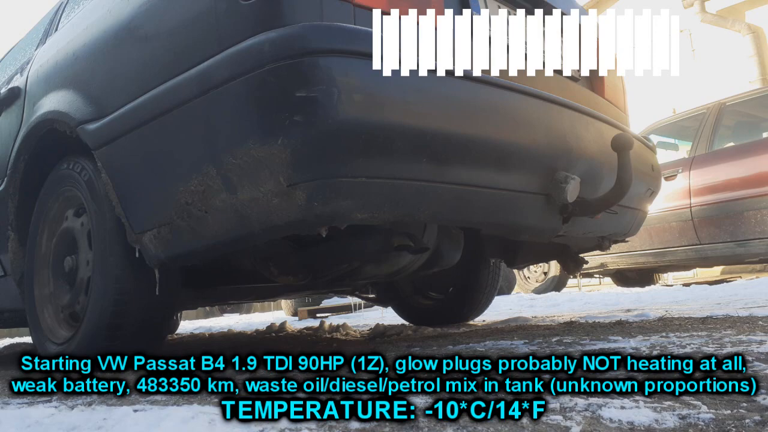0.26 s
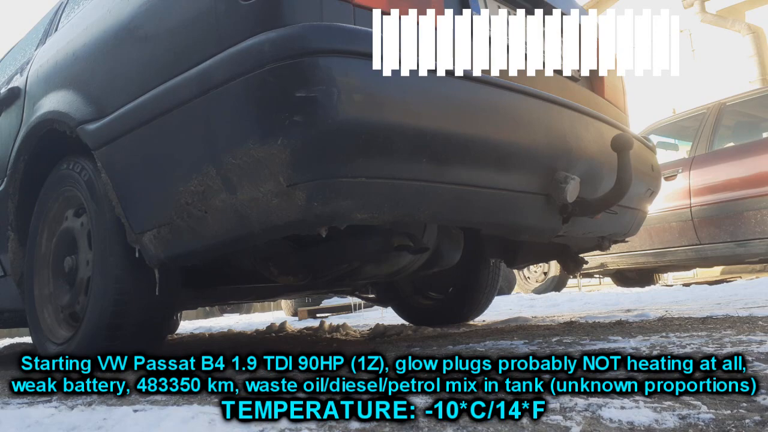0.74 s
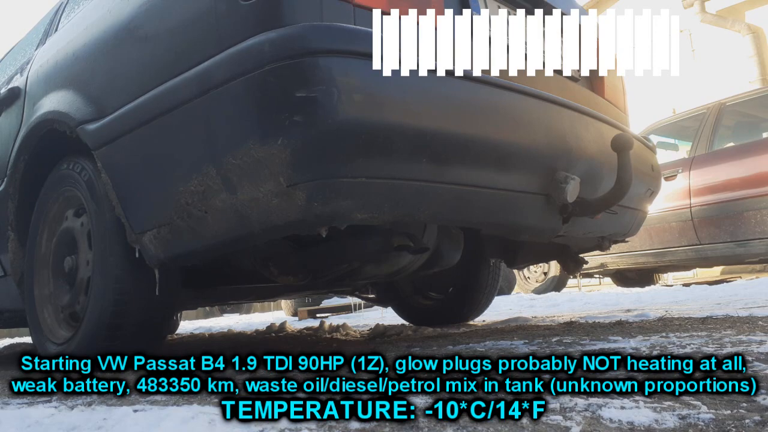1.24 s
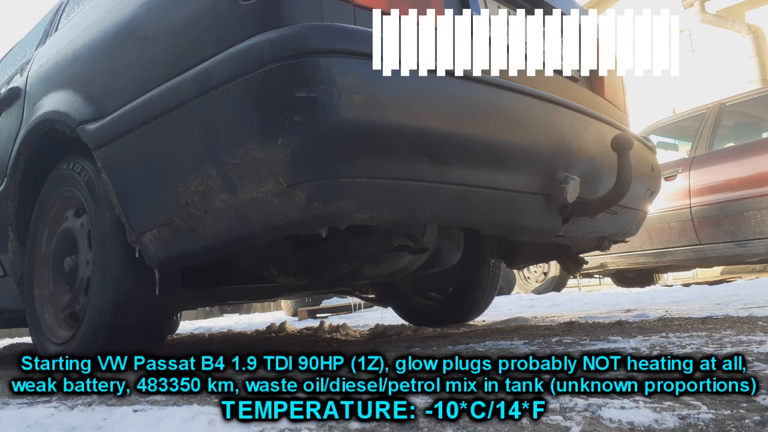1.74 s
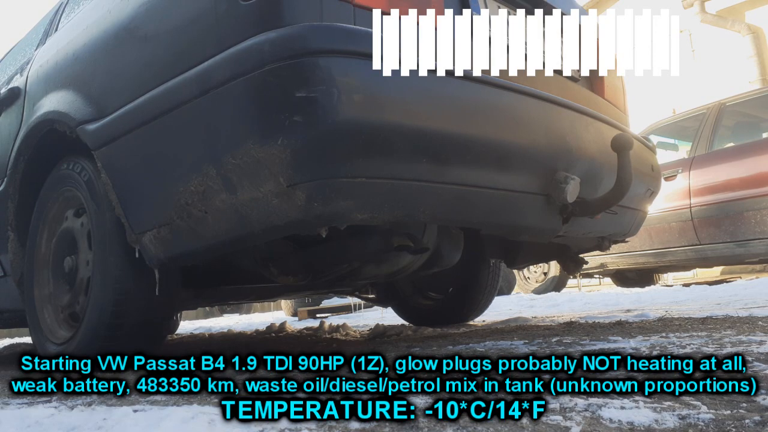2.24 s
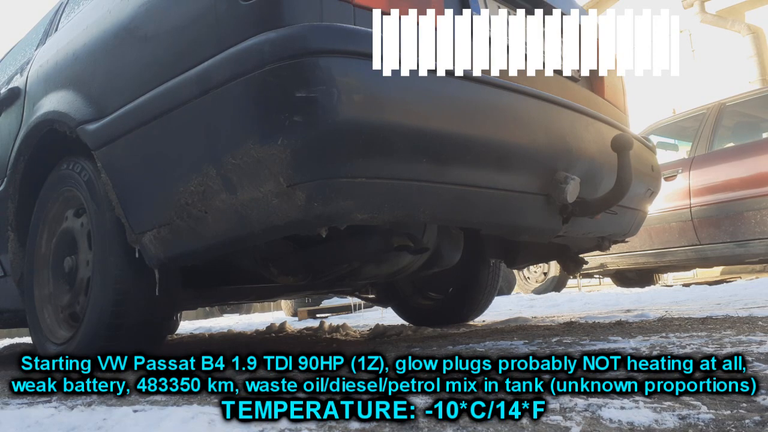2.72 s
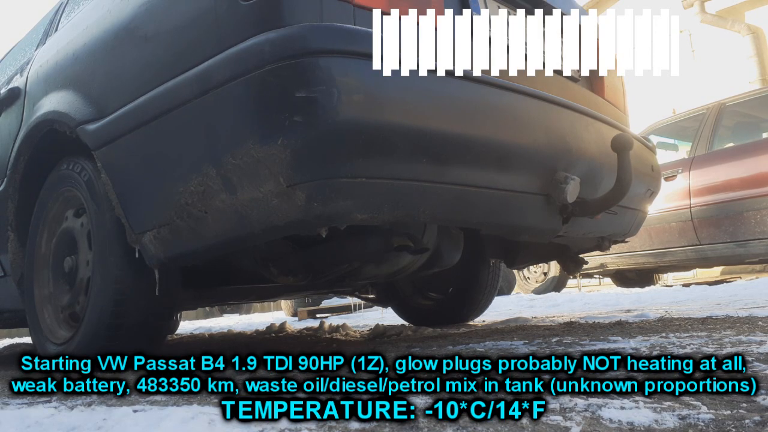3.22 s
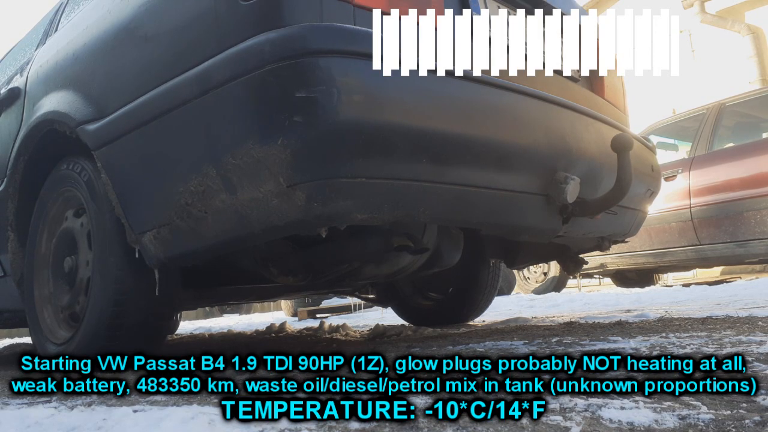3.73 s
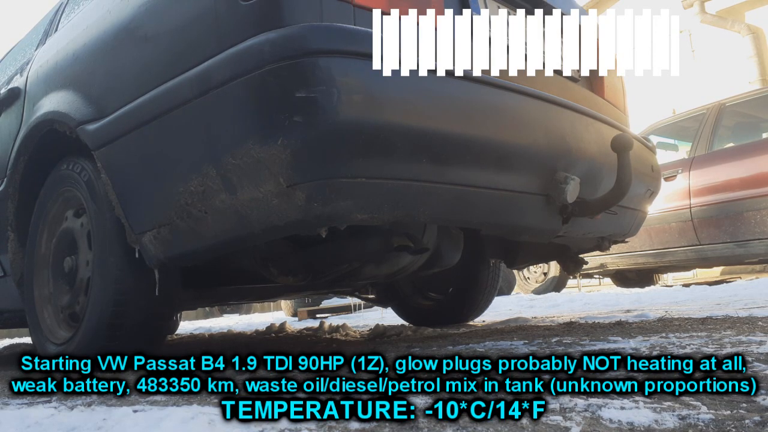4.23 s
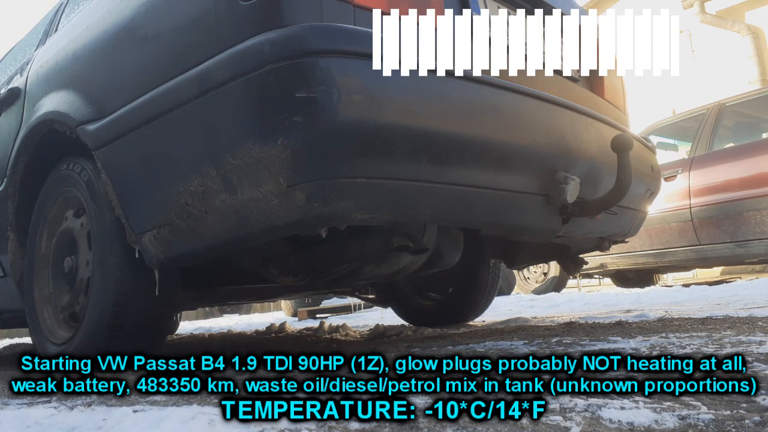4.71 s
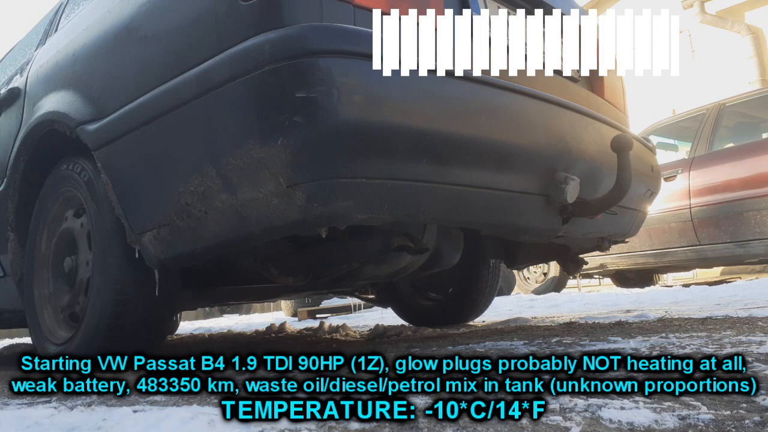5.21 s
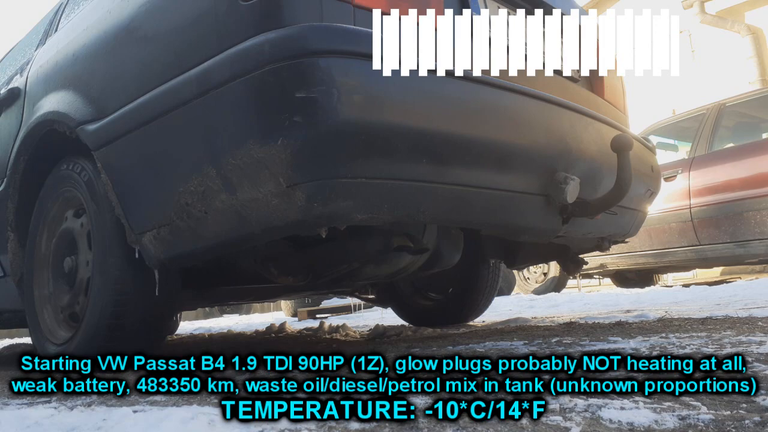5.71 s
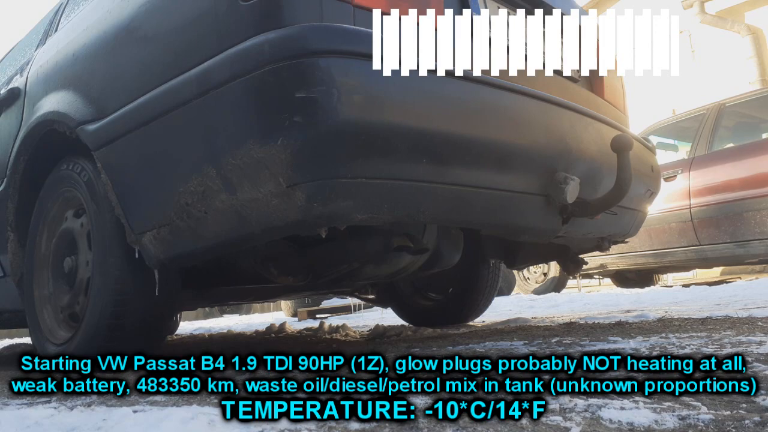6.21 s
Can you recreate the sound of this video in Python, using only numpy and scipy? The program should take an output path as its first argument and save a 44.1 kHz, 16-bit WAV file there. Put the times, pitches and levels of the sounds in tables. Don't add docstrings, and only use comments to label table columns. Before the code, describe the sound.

Muffled thumps, cloth rustle and small metallic ticks inside a parked car, then a starter motor grinds slowly, labouring through heavy compressions without the engine firing.

```python
import sys
import numpy as np
from scipy import signal
from scipy.fft import rfft, irfft, next_fast_len
from scipy.io import wavfile
from scipy.ndimage import uniform_filter1d, map_coordinates

SR = 44100
rng = np.random.default_rng(int(sys.argv[2]) if len(sys.argv) > 2 else 0)


def generate_wav(sig):
    pcm = np.round(np.clip(np.atleast_2d(sig).T, -1, 1) * 32767).astype(np.int16)
    wavfile.write(sys.argv[1], SR, pcm)


def elevation(decibels):
    levels = np.asarray(decibels, float)
    return 10 ** (levels / 20)


N = 284533
TIME = np.arange(N) / SR


def unit(x):
    return x / np.sqrt(np.mean(x ** 2) + 1e-20)


def along(points, hz):
    f, v = np.transpose(points)
    return np.interp(np.log(hz + 1), np.log(f + 1), v)


def curves(rows):
    s, *cols = np.transpose(rows)
    return [np.interp(TIME, s, c) for c in cols]


def wobble(rate_hz):
    knots = rng.standard_normal(int(N * rate_hz / SR) + 4)
    return map_coordinates(knots, [TIME * rate_hz])


def filtered(x, response):
    m = next_fast_len(N + 8192)
    mirror = x[..., :-1025:-1] * np.linspace(1, 0, 1024)
    x = np.concatenate([x, mirror], axis=-1)
    return irfft(rfft(x, m) * response(np.fft.rfftfreq(m, 1 / SR)), m)[..., :N]


def modes(table):
    def response(f):
        total = 0
        for k, (hz, width_hz, db) in enumerate(table):
            damping = 1j * f * width_hz
            total = total + (-1) ** k * elevation(db) * damping / (hz * hz - f * f + damping)
        return total
    return response


def rush(spectrum):
    return unit(filtered(rng.standard_normal((2, N)), lambda f: elevation(along(spectrum, f))))


def puffs(rows, rise_s, knock=0):
    shape, kick, t = np.zeros(N + SR // 2), np.zeros(N + SR // 2), np.arange(SR // 2) / SR
    for s, db, t60_s in rows:
        fall = elevation(db - 60 * t / max(t60_s, .005))
        shape[round(s * SR):][:len(t)] += fall * (1 - np.exp(-t / rise_s))
        kick[round((s + 2 * rise_s) * SR)] -= knock * elevation(db)
    return shape[:N] * rng.standard_normal((2, N)) + kick[:N] * [[1], [.5]]


def swells(rows, fall_db_per_s):
    gain = 0
    for s, hold_s, db, rise_s in rows:
        below_db = 35.5 * np.clip(s - TIME, 0, 9) / rise_s
        gain = gain + elevation(db - below_db - fall_db_per_s * np.clip(TIME - s - hold_s, 0, 9))
    return gain


def fuzzy(hz, spread_hz, steady=0):
    phase = 2 * np.pi * np.cumsum(hz) / SR
    slow = np.array([wobble(spread_hz) for _ in range(4)])
    return unit((slow[:2] + [[steady], [0]]) * np.sin(phase) + slow[2:] * np.cos(phase))


def flares(rows, spread_hz, steady):
    out = np.zeros((2, N + SR))
    for s, length_s, start_hz, end_hz, db in rows:
        u = np.arange(int(length_s * SR)) / (length_s * SR)
        phase = 2 * np.pi * np.cumsum(start_hz + (end_hz - start_hz) * u) / SR
        knots = rng.standard_normal((4, 64))
        slow = np.array([np.interp(u * length_s * spread_hz, np.arange(64), k) for k in knots])
        tone = (slow[:2] + [[steady], [0]]) * np.sin(phase) + slow[2:] * np.cos(phase)
        out[:, round(s * SR):][:, :len(u)] += elevation(db) * np.sin(np.pi * u) * unit(tone)
    return out[:, :N]


# [start_s, clack_db, loaded_s, growl_db, load_rise_db]
STROKES = [
    (4.579, -27.5, 0.1, -44, 0),
    (4.82, -46, 0.26, -41, 6.5),
    (5.15, -54, 0.18, -36.5, -0.5),
    (5.407, -46, 0.16, -38.5, 0.5),
    (5.655, -32, 0.17, -38, 0.5),
    (5.915, -36, 0.16, -37, 0.5),
    (6.181, -34, 0.16, -37, -0.5),
    (6.428, -47, 0.13, -44.5, 6),
]


def crank():
    start_s, _, loaded_s, *_ = np.transpose(STROKES)
    stroke = np.clip(np.searchsorted(start_s, TIME) - 1, 0, None)
    since_s = TIME - start_s[stroke]
    length_s = np.diff(start_s, append=start_s[-1] + .26)[stroke]
    loaded_s = loaded_s[stroke]
    slack = 1 + (since_s - loaded_s) / (length_s - loaded_s)
    return stroke, np.where(since_s < loaded_s, since_s / loaded_s, slack)


# [time_s, pitch_hz, whine_db, top_db, octave_db]
SPIN_UP = [(4.56, 363, -68, -79.5, -68), (4.63, 610, -54, -68, -62), (4.66, 685, -58, -55, -56),
           (4.685, 738, -52, -51, -41), (4.715, 760, -45, -57, -40), (4.735, 745, -38, -52, -41),
           (4.755, 715, -42, -54, -38), (4.775, 705, -45, -60, -42), (4.79, 776, -52, -58, -51),
           (4.82, 886, -55, -60, -62)]
# [phase, pitch_hz, whine_db]
LABOUR = [(0, 993, -42), (.12, 1034, -39), (.35, 898.7, -43), (.52, 820.9, -43), (.87, 502.1, -49),
          (1.25, 870.6, -45), (1.8, 895, -72), (2, 994.8, -64)]


def motor():
    first_top_hz, coast_db = 893, -36
    early_stroke, early_share = 4, .64
    stroke, phase = crank()
    early = stroke == early_stroke
    at, stroke_hz, stroke_db = np.transpose(LABOUR)
    hurried = np.where(early, np.interp(phase, [0, 1, 2], [0, 1 / early_share, 2]), phase)
    hz, db = np.interp(hurried, at, stroke_hz), np.interp(phase, at, stroke_db)
    recover_db = 9 * (hurried > 1.1) * (phase < .97) * early
    coasting = (stroke == 1) & (hz > first_top_hz) & (phase < 1)
    hz = np.where(coasting, first_top_hz, hz)
    db = db + coast_db * coasting + recover_db
    sing_db = 7 * np.exp(-((hz - 850) / 110) ** 2)
    top_db = -62 + sing_db - 9 * (phase > 1) - recover_db
    labour = [hz, db, top_db, db - 18.5]
    return uniform_filter1d(np.where(stroke == 0, curves(SPIN_UP), labour), size=700)


# [mode_hz, width_hz, level_db]
HOUSING = [(198, 35, -3.5), (262, 13.4, -1.5), (325, 46, -4.5), (522.6, 66, -3.5), (663, 75, -2),
           (783, 98, -1.5), (895, 21, 4), (1000, 44, 0), (1194, 9.4, -0.5), (1430, 64, -7)]
# [mode_hz, width_hz, level_db]
PINION = [(1731, 70, -4), (2111, 60, -7), (2438, 70, -2.5), (2668, 55, -2), (2900, 120, -6), (3330, 60, -4),
          (3545, 80, -1)]
# [freq_hz, density_db_per_hz]
GRIT = [(650, -3.5), (1100, 5), (1800, -8.5), (2640, -10.5), (3190, -13), (3530, -10.5), (3810, -10),
        (6830, -25.5), (8840, -49), (12400, -31.5), (16000, -38)]
# [phase, level_db]
GRIT_SHAPE = [(0, 9.3), (.15, 9.5), (.6, 8.76), (1, 1.8), (1.4, 3), (2, 1.5)]
# [phase, level_db]
RING_SHAPE = [(0, 14.5), (.45, -23), (.75, 4.5), (1.1, -1), (1.4, 6), (2, 5.5)]


def teeth():
    start_s, _, _, growl_db, rise_db = np.transpose(STROKES)
    stroke, phase = crank()

    def over(shape):
        return uniform_filter1d(np.interp(phase, *np.transpose(shape)), size=200)

    bite_db = 7 * np.exp(-np.clip(TIME - start_s[0] - .022, 0, 9) / .012)
    eased = np.clip((phase - .91) / (1.09 - .91), 0, 1)
    effort_db = rise_db[stroke] * np.minimum(phase, 1) * (1 - eased) - 5.5 * eased
    load = uniform_filter1d(elevation(growl_db[stroke] + effort_db * (stroke > 0) + bite_db), size=250)

    turns = np.cumsum(motor()[0] / 3 * (1 + .06 * wobble(90))) / SR
    strength = [[1.1], [0]] + np.tanh(rng.standard_normal((2, N)))
    hit = np.diff(np.floor(turns), prepend=0) * strength
    gate = np.exp(-2.5 * (turns % 1))
    drive = unit(hit) + .7 * unit(gate * rng.standard_normal((2, N)))

    lumpy = elevation(1.4 * np.tanh(wobble(60)))
    growl = load * unit(filtered(drive * lumpy, lambda f: modes(HOUSING)(f) / (1 + (f / 1900) ** 2)))
    choke_db = .63 * rise_db[stroke] * np.minimum(phase, 2 - phase)
    grit_db = -47 + np.where(stroke == 0, 2.5 + bite_db, over(GRIT_SHAPE) - choke_db)
    grit = elevation(grit_db) * unit((13.0 + gate) * rush(GRIT))
    ring_db = over(RING_SHAPE) - 63 - 7 * (stroke == 0) + 2.5 * wobble(40)
    ring = elevation(ring_db) * unit(filtered(drive, lambda f: modes(PINION)(f) ** 2))
    return growl + grit + ring


def rocking():
    start_s, _, loaded_s, *_ = np.transpose(STROKES)
    jolts_s = [4.64, 4.756, *(start_s[2:] + .042), *(start_s + loaded_s - .035)[1:]]
    sway = elevation(-60) + elevation(-47.5) * sum(np.exp(-((TIME - s) / .043) ** 2) for s in jolts_s)
    return sway * rush([(25, -36), (45, 8), (58, 11.0), (85, -0.5), (120, -14.5), (170, 7.5), (300, -61.5)])


THUD_DB = [-16.5, -34, -20, -17, -14.5, -13, -17]
# [start_s, level_db]
VALVES = [(4.775, -50), (5.09, -56), (5.36, -41), (5.592, -63), (5.86, -41), (6.108, -59), (6.335, -45),
          (6.385, -40)]


def knocks():
    def gritty(gain_db, low_cut_hz):
        return lambda f: elevation(along(GRIT, f) + gain_db) / (1 + (low_cut_hz / (f + 1)) ** 2)

    start_s, clack_db, *_ = np.transpose(STROKES)
    clacks = puffs([(s, db - 5.0, .06) for s, db in zip(start_s, clack_db)], rise_s=.0018)
    thuds = puffs([(s + .0086, db, .15) for s, db in zip(start_s[1:], THUD_DB)], rise_s=.0081)
    valves = puffs([(s, db, .2) for s, db in VALVES], rise_s=.019)
    block = modes([(195.5, 18, 2.9), (349.0, 21, 6.4)])
    return filtered(clacks, gritty(18.5, 1500)) + filtered(thuds, block) + filtered(valves, gritty(10.5, 1200))


# [start_s, length_s, start_hz, end_hz, level_db]
HOWLS = [(4.585, 0.056, 325, 320, -45.5), (4.7, 0.066, 196, 191, -42), (4.82, 0.051, 218, 205, -41),
         (4.87, 0.091, 1230, 1200, -51), (4.87, 0.049, 2450, 2450, -55), (5.02, 0.063, 341, 298, -35.5),
         (5.03, 0.043, 663, 627, -41), (5.2, 0.031, 884, 910, -49), (5.26, 0.04, 797, 752, -37),
         (5.29, 0.046, 325, 307, -39.5), (5.465, 0.027, 904, 895, -38), (5.5, 0.061, 3036, 2980, -59),
         (5.5, 0.048, 700, 650, -40), (6.03, 0.049, 746, 703, -38), (6.28, 0.057, 738.4, 690, -43.5),
         (4.93, 0.065, 900, 800, -45), (5.655, 0.032, 197, 193, -39), (5.75, 0.049, 671, 698, -40.5),
         (5.785, 0.051, 871, 903, -29), (5.84, 0.022, 2900, 2910, -59), (5.92, 0.041, 353, 344, -40.5),
         (5.96, 0.034, 930, 940, -35), (6.19, 0.049, 258, 246, -38), (6.2, 0.059, 994, 981, -37),
         (6.27, 0.039, 2954, 2920, -56)]
# [start_s, length_s, start_hz, end_hz, level_db]
STREAKS = [(4.565, 0.017, 3540, 3620, -55), (4.815, .035, 2870, 2800, -55), (4.82, 0.035, 2450, 2420, -55),
           (4.822, 0.052, 3515, 3620, -54), (4.872, 0.034, 3680, 3570, -50),
           (4.895, 0.052, 3450, 3250, -52), (5.1, 0.064, 3560, 3480, -62), (5.14, 0.034, 2560, 2590, -54.5),
           (5.158, 0.041, 3370, 3480, -52), (5.2, 0.054, 3700, 3270, -52), (5.195, .055, 2760, 2330, -52),
           (5.262, 0.038, 1506, 1200, -44), (5.355, 0.042, 3470, 3550, -61), (5.41, .04, 1494, 1290, -42),
           (5.462, 0.028, 3640, 3340, -49), (5.51, 0.045, 1494, 1334, -49), (5.588, 0.05, 3330, 3630, -52),
           (5.62, .045, 3550, 3570, -54), (5.648, 0.027, 2720, 2680, -56), (5.69, 0.046, 3560, 3520, -57),
           (5.71, 0.0367, 3420, 3260, -56), (5.685, .03, 1402, 1370, -47), (5.84, 0.05, 3530, 3470, -56),
           (5.91, 0.03, 2200, 2000, -48), (5.96, .04, 3615, 3260, -59), (6.02, 0.039, 1473, 1363, -46),
           (6.11, 0.051, 3510, 3560, -59), (6.11, 0.023, 1380, 1450, -49), (6.222, 0.042, 3620, 3360, -55),
           (6.355, 0.051, 3470, 3620, -53), (6.41, 0.034, 1234, 1460, -43)]


def starter():
    engaged = np.clip((TIME - 4.545) / .037, 0, 1) ** 3
    howls = flares(HOWLS, spread_hz=40, steady=2.2)
    streaks = elevation(2) * flares(STREAKS, spread_hz=90, steady=2.5)
    return engaged * (teeth() + rocking()) + knocks() + howls + streaks


def whine():
    hz, db, top_db, octave_db = motor()
    slow = np.clip((620 - hz) / 130, 0, 1)
    low = fuzzy(hz, 70, 1.8) + elevation(octave_db - db) * fuzzy(2 * hz, 90, 3)
    low = low + elevation(7) * slow * fuzzy(hz * 2 / 3, 30, 2)
    driving = 1. * (np.gradient(hz) * SR < 1500) + (TIME < 4.75)
    pushing = uniform_filter1d(driving, size=600).clip(.1, 1)
    top = elevation(-7) * fuzzy(3 * hz, 120, .6) + fuzzy(4 * hz, 200, 1.8)
    top = pushing * (top + elevation(-5) * (TIME < 4.8) * fuzzy(5 * hz, 250, .5))

    def flare(f):
        return .7 + .4 * abs(modes(HOUSING)(f)) + .25 * abs(modes(PINION)(f))

    return filtered((TIME > 4.56) * (elevation(db) * low + elevation(top_db + 1.0) * top), flare)


# [start_s, peak_db,
# brightness_db, t60_s]
THUMPS = [(0.534, -32.5, -40, 0.044), (0.56, -56, -4, 0.12), (0.585, -32.5, -14, 0.38),
          (0.612, -25, -24, 0.041), (0.666, -48, 1, 0.21), (0.705, -23, -18, 0.13),
          (0.712, -18.5, -26, 0.037), (0.725, -23, -14, 0.062), (2.822, -50, -33, 0.085),
          (3.701, -34, -31, 0.094), (3.808, -26.5, -26, 0.067), (0.93, -38, -33, 0.15),
          (1.012, -38.5, -27, 0.13), (1.237, -27.5, -32, 0.17), (1.292, -46, -33, 0.53),
          (1.347, -53, -26, 0.12), (1.39, -36, -29, 0.19), (1.61, -31.5, -25.5, 0.35),
          (1.641, -16, -51, 0.061), (2.118, -42, -13, 0.33), (2.789, -40, -19, 0.32),
          (3.016, -53, -2.5, 0.11), (2.327, -58, -5, 0.13), (3.421, -40.5, -30, 0.12),
          (3.502, -42.5, -41, 0.17), (3.582, -25.5, -22.5, 0.17), (3.651, -11.5, -18.5, 0.057),
          (3.795, -24.5, -24.5, 0.37), (3.817, -23, -15, 0.08), (3.842, -30, -16, 0.21),
          (3.891, -52, -27, 0.13), (4.141, -43, -22, 0.047), (4.34, -45, -5.5, 0.12),
          (4.362, -50, -9, 0.058), (4.386, -44, -13, 0.13), (3.663, -26, -15, 0.15), (4.55, -33, -12, 0.18)]
# [start_s, hold_s, level_db, rise_s]
SHUFFLE = [(.55, 0.069, -52, 0.082), (.7, 0.053, -52, 0.04), (.94, 0.0065, -53, 0.12),
           (1.38, 0.018, -56.5, 0.78), (1.46, 0.18, -64, 0.03), (1.64, 0.033, -52.5, 0.22),
           (3.61, 0.08, -50, 0.051), (3.84, 0.016, -47, 0.13), (3.9, 0.097, -58.5, 0.054)]
# [start_s, level_db, t60_s]
BOOMS = [(.6, -16, 0.47), (.71, -29, 0.24), (1.0, -29, 0.98), (3.65, -29, 0.24), (3.795, 0.5, 0.25),
         (3.84, -25, 0.15)]
# [mode_hz, width_hz, level_db]
SHELL = [(61, 14, -7), (105.5, 15, -1), (253.6, 203, 0.5), (368, 272, 0), (611, 180, -5)]
# [mode_hz, width_hz, level_db]
PANELS = [(800, 84, -0.5), (900, 140, 7), (1090, 204, 3.5), (1350, 195, 1), (1780, 54, -9), (2010, 90, -9),
          (2720, 350, -13)]


def driver():
    def soft(table, hz):
        return lambda f: modes(table)(f) / (1 + 1.4j * f / hz - (f / hz) ** 2) ** 2

    def floor_pan(f):
        return modes([(70, 40, -3), (115, 45, 0), (160, 50, -3)])(f) / (1 + (f / 250) ** 4)

    blows = puffs([(s - .004, db + 8, t60) for s, db, _, t60 in THUMPS], rise_s=.004, knock=6.8)
    sharp = puffs([(s - .003, db + bright + 9, .6 * t60) for s, db, bright, t60 in THUMPS], rise_s=.007)
    thumps = filtered(blows, soft(SHELL, 870)) + filtered(sharp, soft(PANELS, 2030))
    lumps = elevation(4.2 * wobble(40)) * rng.standard_normal((2, N))
    shifting = unit(filtered(lumps, soft(SHELL, 920)))
    shifting = shifting + elevation(-21.0) * unit(filtered(lumps, soft(PANELS, 3900)))
    booms = filtered(puffs(BOOMS, rise_s=.043), floor_pan)
    return thumps + swells(SHUFFLE, fall_db_per_s=154) * shifting + booms


# [start_s, hold_s, level_db, rise_s, fine_over_coarse_db]
RUSTLE = [(0.628, 0.0031, -61.5, 0.16, -4), (.67, .005, -66.5, 0.016, -1), (0.92, 0.084, -81.5, 0.067, -2),
          (1.256, 0.077, -78, 0.11, 7), (1.31, .005, -89, .03, 19), (1.38, 0.0035, -59.5, 0.049, -9),
          (1.472, 0.11, -75, 0.026, 3), (1.62, 0.011, -66, 0.48, -0.5), (2.123, 0.0045, -65, 0.15, -5),
          (2.324, .005, -68, 0.011, 1), (4.153, .005, -78, 0.82, -7), (4.384, 0.0037, -69, 0.14, -2)]
# [freq_hz, density_db_per_hz]
CLOTH = [(880, -38), (1500, -13.5), (2660, -5.5), (3180, -12.5), (3880, -2.5), (6000, -4.5), (7240, -10.5),
         (8600, -41)]
# [freq_hz, density_db_per_hz]
FINE = [(8000, -43), (10500, -7.5), (13400, 0), (16000, 1.5)]


def cloth():
    fall_db_per_s = 210
    grain = elevation(1.4 * wobble(150))
    coarse = swells([row[:4] for row in RUSTLE], fall_db_per_s) * rush(CLOTH)
    fine_rows = [(s, hold_s, db + fine_db, rise_s) for s, hold_s, db, rise_s, fine_db in RUSTLE]
    fine = swells(fine_rows, fall_db_per_s) * rush(FINE)
    return grain * (elevation(-3.5) * coarse + elevation(-6.5) * fine)


# [start_s, length_s, start_hz, end_hz,
# level_db]
CREAKS = [(.55, 0.027, 1016, 965, -59.5), (.583, 0.041, 2010, 2000, -76), (.659, 0.027, 1000, 1040, -67),
          (.66, 0.022, 2050, 2030, -66), (1.395, 0.083, 1126, 1160, -63.5), (1.4, 0.037, 2330, 2350, -74),
          (1.46, .03, 2720, 2720, -83), (1.5, 0.082, 2750, 2680, -80), (1.54, 0.14, 1940, 1950, -77.5),
          (1.71, 0.059, 2500, 2530, -83), (2.05, 0.087, 1160, 1120, -76), (2.12, .035, 1272, 1220, -64),
          (.704, 0.019, 1336, 1420, -51), (.718, .02, 1680, 1700, -64), (.66, 0.028, 1400, 1450, -64),
          (3.647, 0.016, 1350, 1380, -49), (3.66, 0.019, 1650, 1710, -60), (2.45, 0.15, 890, 1060, -74),
          (2.5, 0.21, 1052, 983, -75.5), (3.37, 0.22, 1000, 1068, -73), (3.795, 0.035, 2470, 2460, -72),
          (4.337, 0.033, 1620, 1610, -72)]


def creaks():
    return flares(CREAKS, spread_hz=130, steady=1.2)


# [start_s, peak_db, ring_hz, top_db]
TICKS = [(0.357, -61, 1500, -36), (.423, -62, 5600, -35), (1.239, -55.5, 5340, -20),
         (1.371, -51, 3870, -37), (1.8861, -65, 5520, -35), (2.034, -56.5, 6560, -26),
         (2.0716, -51, 5270, -41), (2.102, -46, 5300, -43), (2.122, -43.5, 3740, -28),
         (2.192, -76, 7000, -5), (2.3284, -49.5, 3680, -29), (2.794, -55, 3740, -40),
         (2.9687, -61, 4130, -14), (3.015, -51.5, 5200, -16.5), (3.0847, -47, 6540, -23.5),
         (3.5, -67.5, 7400, -11), (3.575, -53.5, 6200, -21), (2.794, -67, 2700, -40),
         (2.978, -66, 3230, -40), (3.024, -62, 2700, -40), (2.036, -67, 3000, -40), (4.366, -53, 3500, -40),
         (3.8396, -61.5, 2800, -35), (4.113, -64, 5800, -48), (4.131, -69, 6800, -42),
         (4.139, -49, 6800, -41), (4.307, -64, 5500, -40), (4.34, -48, 5950, -29), (4.362, -51, 6400, -27),
         (4.385, -48.5, 7400, -15.5)]


def ticks():
    out = np.zeros((2, N + SR // 4))
    t = np.arange(SR // 4) / SR
    f = np.fft.rfftfreq(len(t), 1 / SR)
    dull = 1 / (1 + (f / 7500) ** 16)
    snap, tail = elevation(-60 * t / .02), elevation(-12 - 60 * t / .14)
    decay = (snap + tail) * (1 - np.exp(-t / .0005))
    for s, db, hz, top_db in TICKS:
        crack = decay * rng.standard_normal((2, len(t)))
        ring = modes([(hz, 900, 0), (5500, 4500, -7 - 12 * (hz < 3200))])(f)
        ring = ring * dull / (1 + (.5 * hz / (f + 1)) ** 4)
        top = modes([(14000, 4500, top_db + 8)])(f) / (1 + (10800 / (f + 1)) ** 12)
        out[:, round(s * SR):][:, :len(t)] += elevation(db + 7.0) * irfft(rfft(crack) * (ring + top), len(t))
    return out[:, :N]


# [time_s, hum_db, drone_db, drone_hz]
TOWN = [(0, -64, -100, 800), (.5, -66.5, -100, 800), (1.15, -69.5, -101, 800), (2.4, -62.5, -81, 790),
        (2.95, -66, -79.5, 760), (3.12, -63, -79.5, 870), (3.55, -62, -76, 915), (4.1, -62, -78.5, 885)]
# [freq_hz, density_db_per_hz]
HUM = [(15, -30), (28, 8.5), (70, -2.5), (356, -1), (605, -8.5), (928, -22.5), (994, -21), (1180, -23),
       (1500, -28.5), (1950, -73), (3300, -120)]
# [freq_hz, density_db_per_hz]
HISS = [(710, -60), (1200, -14), (1810, -6.5), (2150, -7), (5240, -10), (9110, -17.5), (13900, -4.5),
        (16000, -5)]


def town():
    hum_db, drone_db, drone_hz = curves(TOWN)
    hum = elevation(hum_db + 1.5 * wobble(6)) * rush(HUM)
    drone = elevation(drone_db - 1.5) * fuzzy(drone_hz * (1 + .02 * wobble(5)), spread_hz=170, steady=.9)
    return hum + drone + elevation(-74.5) * rush(HISS)


# [freq_hz, likeness]
ALIKE = [(60, .98), (250, .96), (500, .84), (850, .68), (1150, .1), (1600, .5), (2200, .25), (3600, .55),
         (8000, 0.05)]
# [freq_hz, share]
LAG_SHARE = [(500, .62), (850, 1)]


def ports(pair, nearer, lead_s):
    side = np.array([[1], [-1]])

    def split(f):
        turn = np.arccos(np.clip(along(ALIKE, f), 0, 1)) / 2
        return np.array([np.cos(turn), np.sin(turn)])

    def arrival(f):
        lag = np.exp(side * 1j * np.pi * f * lead_s * along(LAG_SHARE, f))
        return elevation(side * along(nearer, f) / 2) * lag

    shared, apart = filtered(pair, split)
    return filtered(shared + side * apart, arrival)


# [freq_hz, left_over_right_db]
NEARER = [(60, 6), (380, 6), (700, 5.5), (1290, 7.5), (4400, 6), (6000, 10), (7700, 23), (15000, 18)]
# [freq_hz, left_over_right_db]
AROUND = [(60, 4.5), (110, 10.5), (200, 9.5), (380, 5.5), (700, 11), (1290, 5.5), (2380, 4.5), (4400, 1),
          (8120, 2.5), (15000, 0.5)]


def scene():
    engine = ports(starter() + whine(), NEARER, lead_s=.00037)
    cabin = ports(driver() + cloth() + creaks() + ticks(), NEARER, lead_s=.000316)
    return engine + cabin + ports(town(), AROUND, lead_s=.00022)


def roll_off(x):
    return signal.sosfilt(signal.butter(12, 16660, fs=SR, output="sos"), x)


def record(dry):
    def band(f):
        return (f < 15830) / (1 + (45 / (f + 1)) ** 4)

    return roll_off(filtered(dry, band))


dry = scene()
out = record(dry)
generate_wav(out)
```